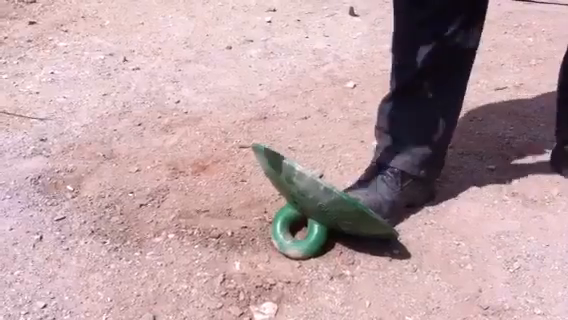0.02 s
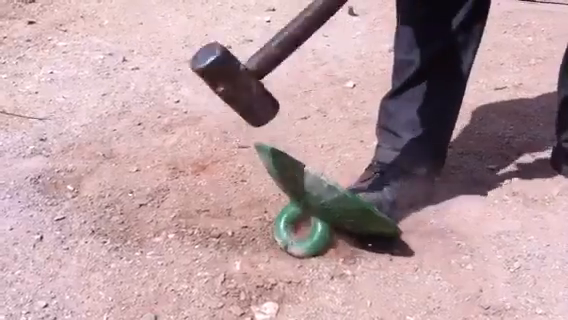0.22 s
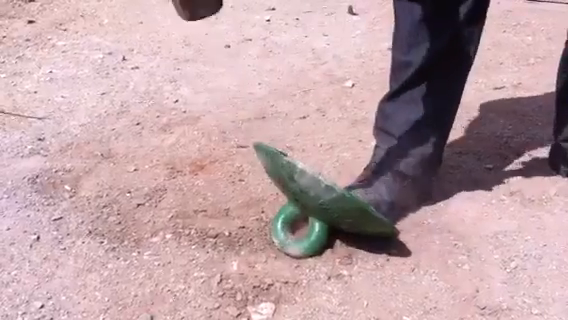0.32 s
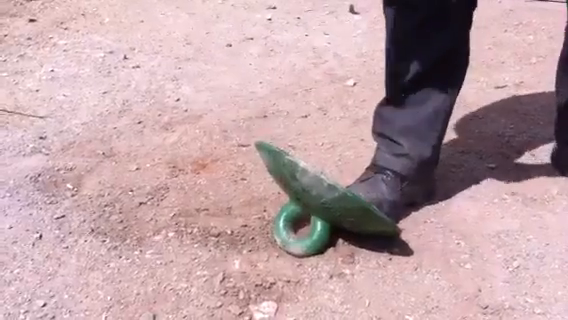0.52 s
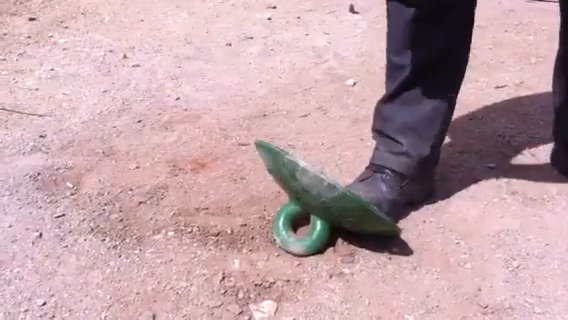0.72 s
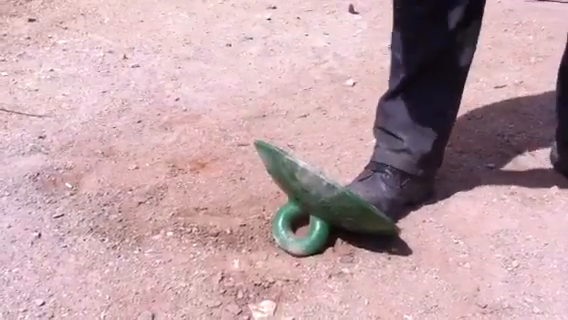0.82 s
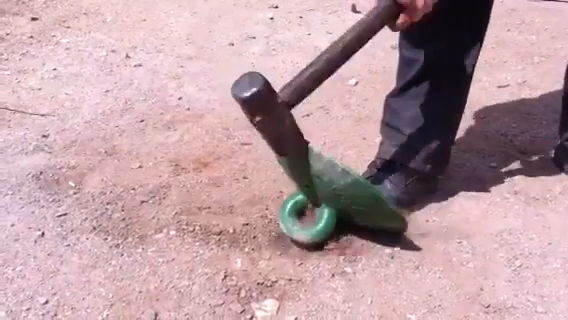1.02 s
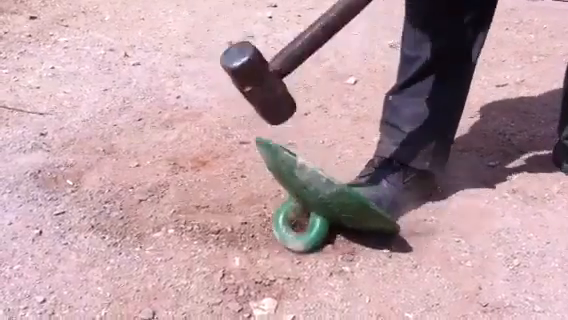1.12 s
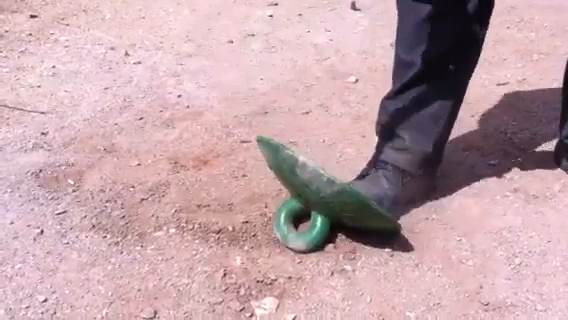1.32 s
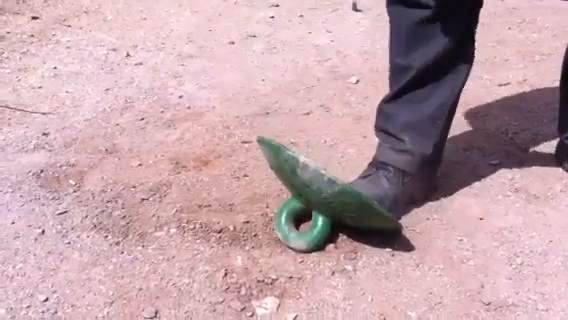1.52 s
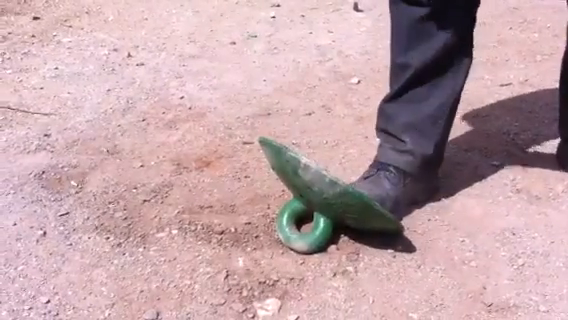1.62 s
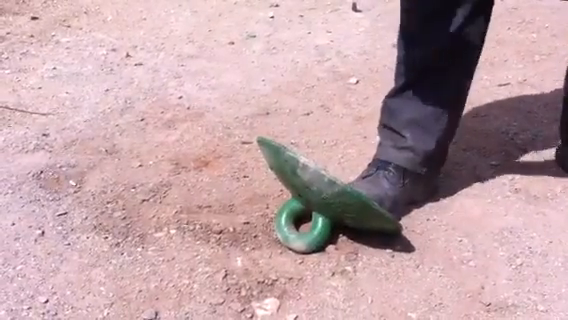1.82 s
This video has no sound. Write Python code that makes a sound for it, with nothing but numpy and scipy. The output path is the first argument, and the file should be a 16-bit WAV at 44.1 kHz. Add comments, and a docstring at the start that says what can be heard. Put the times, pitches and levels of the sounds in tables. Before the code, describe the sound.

Two loud, clipped clangs of a heavy hammer on a thick steel disc, outdoors on gravel

```python
"""Outdoors on gravel, in a bed of filtered-noise air and a hiss that comes and goes: first a bird chirps in
fluttering sine glides. Then a sledgehammer strikes a cast steel disc: noise crack, short clang of damped modes,
low thud, crunch and drop-back; the yard answers faintly. Feet shift, a second blow follows, then a thin high
whistle glides on and feet shift again. The recorder's limiter squeezes and clips the blows."""
import sys
import numpy as np
from scipy import signal
from scipy.fft import rfft, irfft, next_fast_len
from scipy.io import wavfile
from scipy.ndimage import uniform_filter1d

SR = 44100
rng = np.random.default_rng(int(sys.argv[2]) if len(sys.argv) > 2 else 0)


def unload_wav(signal):
    """Save mono or channel-first audio to the path in sys.argv[1] as 16-bit WAV at rate SR, clipped to [-1, 1]."""
    wavfile.write(
        sys.argv[1],
        SR,
        np.round(np.clip(np.atleast_2d(signal).T, -1, 1) * 32767).astype(np.int16),
    )


N = 83790

# spectrum of soft low bumps, disc settling or feet: [f/Hz, relative density/dB]
SOFT_BUMP = [(25, -35), (70, -23.5), (130, 0), (200, -5.5), (330, -10), (800, -28), (3000, -60)]


def amp(db):
    """Level in dB to amplitude."""
    return 10 ** (np.asarray(db) / 20)


def unit(x):
    """Scale to rms 1."""
    return x / np.sqrt(np.mean(x ** 2) + 1e-20)


def along(points, hz):
    """Interpolate (Hz, value) points on a log frequency axis."""
    f, v = np.transpose(points)
    return np.interp(np.log(hz + 1), np.log(f + 1), v)


def clock():
    """Time of every sample in s."""
    return np.arange(N) / SR


def curve(points):
    """Interpolate (s, value) points to one value per sample."""
    s, value = np.transpose(points)
    return np.interp(clock(), s, value)


def filtered(x, response):
    """Multiply the spectrum of x by a response of frequency in Hz."""
    size = next_fast_len(N + 8192)
    hz = np.fft.rfftfreq(size, 1 / SR)
    return irfft(rfft(x, size) * response(hz), size)[:N]


def noise(spectrum):
    """Coloured Gaussian noise of rms 1."""
    white = rng.standard_normal(N)
    return unit(filtered(white, lambda hz: amp(along(spectrum, hz))))


def smooth_random(samples):
    """Slow random curve of rms 1: white noise under a moving average."""
    return unit(uniform_filter1d(rng.standard_normal(N), size=samples))


def decay(t, t60_s):
    """Exponential decay, 60 dB down after t60."""
    return np.exp(-np.log(1000) * t / t60_s)


def struck(start_s, rise_s, t60_s):
    """Envelope of a struck body: quick rise, exponential decay."""
    t = np.maximum(clock() - start_s, 0)
    return (1 - np.exp(-t / rise_s)) * decay(t, t60_s)


def tone(hz, waver):
    """Sine of rms 1 whose pitch wavers at random by the given rms fraction."""
    unsteady_hz = hz * (1 + waver * smooth_random(150))
    return np.sqrt(2) * np.sin(2 * np.pi * np.cumsum(unsteady_hz) / SR)


def air():
    """Outdoor air: steady coloured noise with a second-order treble roll-off."""
    # [f/Hz, relative density/dB]
    air_spectrum = [(15, -51), (25, -17), (54, -44), (93, -3.5), (177, 0), (642, -8), (706, -8.5),
                    (759, -13), (897, -8.5), (2020, -12), (3250, -24), (4330, -15), (5000, -24),
                    (7500, -30.5), (9750, -61), (16500, -120)]
    level_db, top_hz = -56, 8000
    return amp(level_db) * filtered(noise(air_spectrum), lambda hz: 1 / np.sqrt(1 + (hz / top_hz) ** 4))


def hiss():
    """Soft coloured noise that comes and goes."""
    # level course: [t/s, level/dB]
    hiss_level = [(0, -63.5), (.19, -65), (.55, -65.5), (.858, -65), (.868, -55.5), (.9, -57.5),
                  (1.11, -59.5), (1.5, -58.5), (1.7, -64), (1.9, -76)]
    # [f/Hz, relative density/dB]
    hiss_spectrum = [(300, -15), (2000, 9), (3200, -9), (4400, 0.5), (7000, 1), (10000, -5.5),
                     (15000, -10.5), (16500, -33.5)]
    return amp(curve(hiss_level)) * noise(hiss_spectrum)


def whistle():
    """Thin high sine with gliding pitch and changing level."""
    # level course: [t/s, level/dB]
    whistle_level = [(1.22, -120), (1.28, -60), (1.32, -65), (1.385, -52), (1.46, -57), (1.52, -66),
                     (1.59, -79), (1.615, -62.5), (1.73, -63.5), (1.9, -64.5)]
    # pitch course: [t/s, f/Hz]
    whistle_pitch = [(1.28, 8660), (1.39, 8590), (1.58, 8545), (1.73, 8603), (1.9, 8713)]
    return amp(curve(whistle_level)) * tone(curve(whistle_pitch), waver=.001)


def yard(x):
    """Scattered echoes from near and far surfaces: noise tails whose decay depends on frequency."""
    # tail colour at its onset: [f/Hz, relative level/dB]
    yard_colour = [(100, -20.5), (600, 1), (2000, 0), (3000, -2.5), (4400, -9), (8000, -9), (15000, -14.5)]
    # full decay time: [f/Hz, t60/s]
    yard_t60 = [(200, 0.2), (1500, 0.91), (4500, 0.99), (12000, .4)]
    # near and far surfaces: [delay/s, level/dB, share of full decay time/1]
    walls = [(.035, -28.5, 0.46), (.15, -34, 0.78)]
    out = np.zeros(N)
    for delay_s, db, share in walls:
        hz, t, bands = signal.stft(rng.standard_normal(SR), SR, nperseg=256)
        t60_s = share * along(yard_t60, hz)
        gain = amp(along(yard_colour, hz))[:, None] * decay(t, t60_s[:, None])
        tail = signal.istft(bands * gain, SR, nperseg=256)[1]
        tail = tail / np.linalg.norm(tail)
        delayed = np.pad(tail, (round(delay_s * SR), 0))
        out += amp(db) * signal.fftconvolve(x, delayed)[:N]
    return out


def bird():
    """Short gliding notes with fluttering level, plus their yard echo."""
    # notes, level before flutter: [start/s, length/s, first f/Hz, last f/Hz, level/dB]
    chirps = [(.082, .034, 4080, 4190, -53), (.118, .032, 4190, 4150, -59), (.126, .022, 3120, 3700, -63),
              (.144, .016, 4500, 4700, -63)]
    flutter_db = 6  # rms
    out = np.zeros(N)
    for start_s, length_s, first_hz, last_hz, db in chirps:
        progress = np.clip((clock() - start_s) / length_s, 0, 1)
        envelope = np.sqrt(np.abs(np.sin(np.pi * progress)))
        glide_hz = first_hz + (last_hz - first_hz) * progress
        out += amp(db) * envelope * tone(glide_hz, waver=.012)
    out = out * amp(flutter_db * smooth_random(300))
    return out + yard(out)


def feet():
    """Feet shifting on the ground: soft, low noise bumps."""
    # [t/s, level/dB]
    shuffles = [(0.87, -52.5), (1.879, -48.5)]
    return sum(amp(db) * noise(SOFT_BUMP) * struck(start_s, .006, 0.24) for start_s, db in shuffles)


def bump(start_s, hz, spectrum, t60_s):
    """Short push into soil: a decaying low sine with rumbling noise."""
    rattle_db = -2.5  # relative to the sine
    push = np.sqrt(2) * np.sin(2 * np.pi * hz * (clock() - start_s))
    return (push + amp(rattle_db) * noise(spectrum)) * struck(start_s, .002, t60_s)


def ground(start_s, thud_db):
    """Disc driven into the gravel and dropping back: thud, crushed-gravel noise, softer thump."""
    # thud noise: [f/Hz, relative density/dB]
    thud_spectrum = [(25, -27), (70, -25.5), (130, -16), (220, -2.5), (330, -6.5), (800, -20.5),
                     (3000, -64.5)]
    # gravel crushed under the disc: [f/Hz, relative density/dB]
    crunch_spectrum = [(60, -36.5), (200, -14.5), (500, 3.5), (1000, 6), (2400, 4.5), (3300, -3.5),
                       (4600, 4.5), (7000, -9), (15000, -38)]
    crunch_db, crunch_t60_s = -15, .24
    drop_db, drop_delay_s = -34, .092
    thud = amp(thud_db) * bump(start_s, 220.3, thud_spectrum, t60_s=.09)
    drop = amp(drop_db) * bump(start_s + drop_delay_s, 160, SOFT_BUMP, t60_s=.05)
    crunch = amp(crunch_db) * noise(crunch_spectrum) * struck(start_s, .004, crunch_t60_s)
    return thud + drop + crunch


def ring(start_s, hz, t60_s, db):
    """Sum of damped modes excited at one moment, with random phases and a common rise."""
    rise_s = .004
    t = np.arange(SR // 2) / SR
    phase = rng.uniform(0, 2 * np.pi, (len(hz), 1))
    modes = np.sin(2 * np.pi * hz[:, None] * t + phase) * decay(t, t60_s[:, None])
    sound = np.sqrt(2) * amp(db) @ modes * (1 - np.exp(-t / rise_s))
    return np.pad(sound, (round(start_s * SR), N))[:N]


def overtones(start_s, count=85):
    """Weak, short modes that make the clang harsh; they thin out towards the top."""
    # mean level of each overtone: [f/Hz, level/dB]
    overtone_level = [(500, -36.5), (1000, -29.5), (2200, -39), (3200, -44.5), (4700, -29.5), (6000, -34.5),
                      (8300, -33), (11000, -39), (15500, -37.5)]
    mean_t60_s, scatter_db = 0.16, 3
    position = (np.arange(count) + rng.random(count)) / count
    hz = 500 + 15200 * position ** 1.6
    t60_s = mean_t60_s * rng.uniform(.7, 1.3, count)
    db = along(overtone_level, hz) + scatter_db * rng.standard_normal(count)
    return ring(start_s, hz, t60_s, db)


def clang(index, start_s):
    """Disc ringing: main modes, weighted by the spot struck, plus an overtone cloud."""
    # disc modes: [f/Hz, t60/s, level in first blow/dB, level in second blow/dB]
    disc = [(208, .13, -22, -27), (709, .18, -24, -20), (1228, .17, -12, -8), (1940, .28, -31, -27),
            (2004, .17, -22, -30), (2066, .23, -23, -26), (2207, .18, -23, -32), (2501, .2, -13, -11),
            (2545, .22, -15, -21), (2735, .2, -27, -21), (2772, .33, -29, -26), (3700, .42, -36, -34),
            (3730, .42, -31, -39), (4265, .265, -7, -10), (4473, .25, -8, -16.5), (4760, .27, -15, -20),
            (5160, .25, -18, -20.5), (5412, .2, -30, -22), (5465, .25, -29, -23), (6663, .18, -33, -19),
            (7065, .16, -24, -34), (8480, .21, -27, -30), (9135, .35, -52, -42), (10350, .24, -33, -29),
            (12050, .17, -32, -28), (13390, .45, -55, -38), (14155, .28, -29, -23), (15110, .15, -34, -32),
            (15620, .25, -45, -38)]
    hz, t60_s, *levels_db = np.transpose(disc)
    return ring(start_s, hz, t60_s, levels_db[index]) + overtones(start_s)


def crack(start_s, db):
    """Steel meets steel: a short burst of coloured noise."""
    # [f/Hz, relative density/dB]
    crack_spectrum = [(100, -33), (400, -1), (1000, 6), (1500, -2), (2100, 3.5), (2700, 4), (3250, -7.5),
                      (4700, 6.5), (6000, -8), (8000, -5), (11000, -16.5), (16000, -21)]
    base_db, rise_s, t60_s = 1, .002, .043
    return amp(base_db + db) * noise(crack_spectrum) * struck(start_s, rise_s, t60_s)


def hammering():
    """Each blow sums crack, ground and clang, and excites the yard."""
    # blows, thud and crack relative to the blow: [t/s, level/dB, thud level/dB, crack offset/dB]
    blows = [(.2098, -0.5, -17, 3), (1.1349, 2, -18, -2.5)]
    ring_echo_db = -7.5  # the ring excites the yard less than the impact does
    out = np.zeros(N)
    for index, (start_s, db, thud_db, crack_db) in enumerate(blows):
        ringing = clang(index, start_s)
        impact = crack(start_s, crack_db) + ground(start_s, thud_db)
        echo = yard(impact + amp(ring_echo_db) * ringing)
        out += amp(db) * (impact + ringing + echo)
    return out


def scene():
    """Mix of all sources, one channel."""
    return (air() + hiss() + whistle() + bird() + feet() + hammering())[None]


def record(dry):
    """Limiter ducks the blows and recovers; overshoot is soft-clipped, then the band is limited."""
    limit_db, release_s, smoothing_s = -3, 0.053, 0.0069
    clip_top, low_cut_hz, top_hz = 0.68, 55, 16300
    x = dry[0]
    # peak hold of the excess, its dB decaying exponentially
    recovery = np.exp(-clock() / release_s)
    over_db = np.maximum(20 * np.log10(np.abs(x) + 1e-9) - limit_db, 0)
    held_db = np.maximum.accumulate(over_db / recovery) * recovery
    # one-pole lag lets the onset overshoot
    pole = np.exp(-1 / (smoothing_s * SR))
    reduction_db = signal.lfilter([1 - pole], [1, -pole], held_db)
    x = x * amp(-reduction_db)
    x = x / (1 + np.abs(x / clip_top) ** 6) ** (1 / 6)
    x = signal.sosfilt(signal.butter(1, low_cut_hz, "highpass", fs=SR, output="sos"), x)
    return filtered(x, lambda hz: 1 / np.sqrt(1 + (hz / top_hz) ** 120))[None]


dry = scene()
out = record(dry)
unload_wav(out)
```